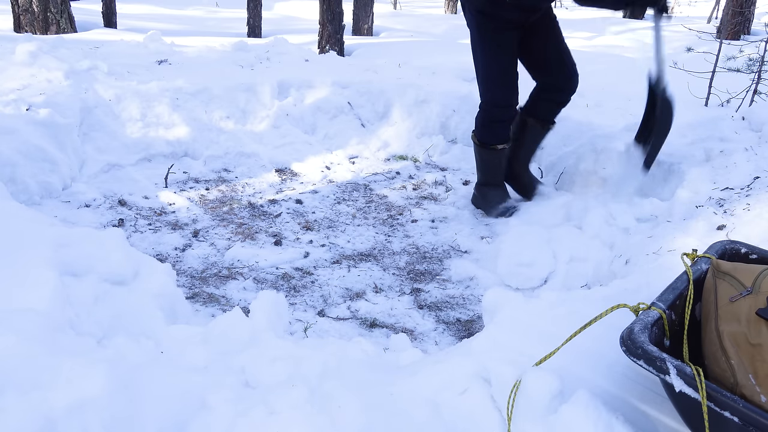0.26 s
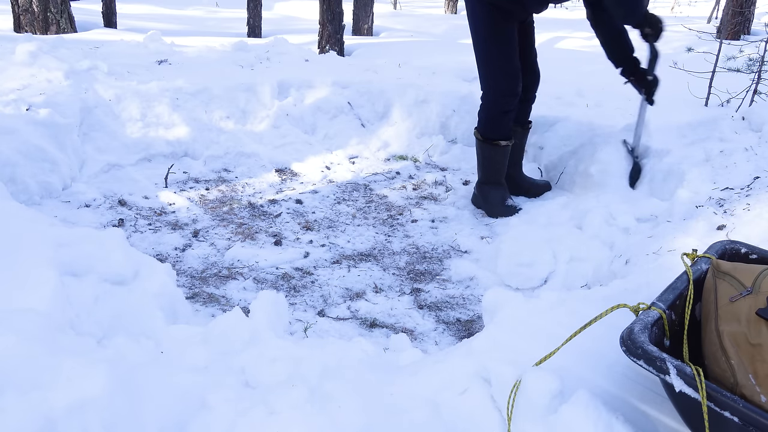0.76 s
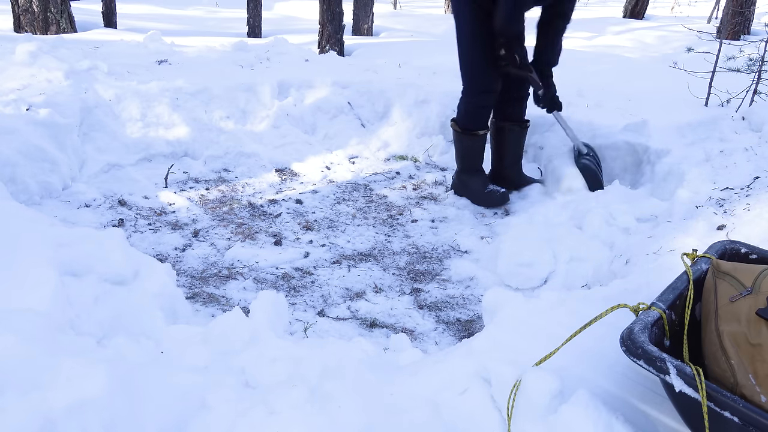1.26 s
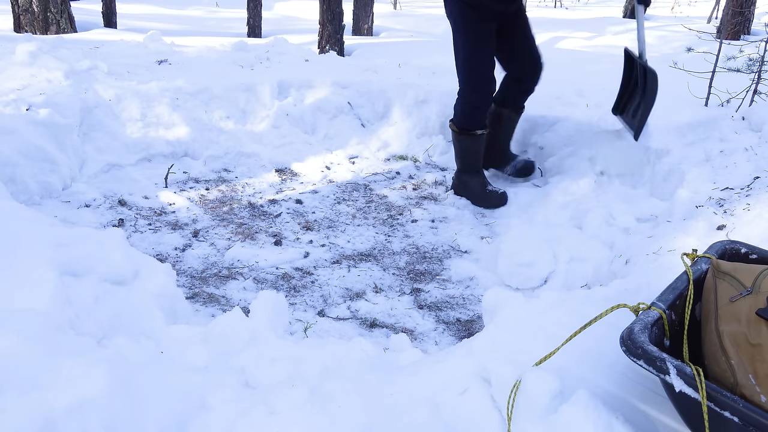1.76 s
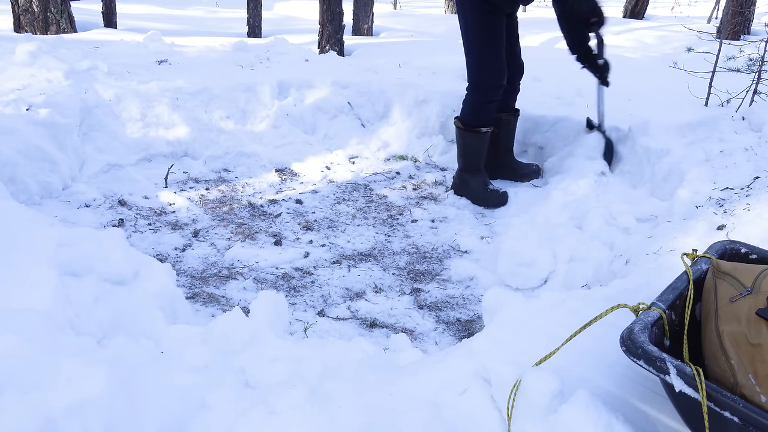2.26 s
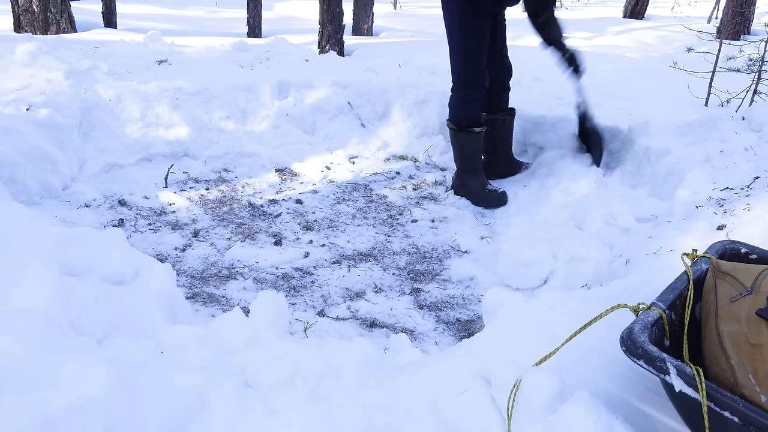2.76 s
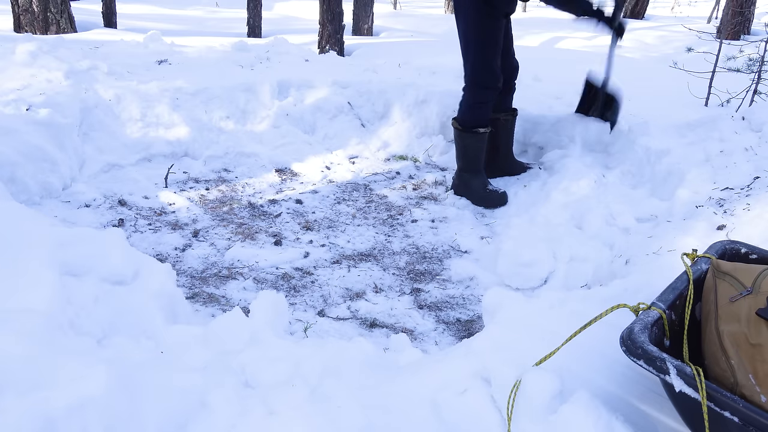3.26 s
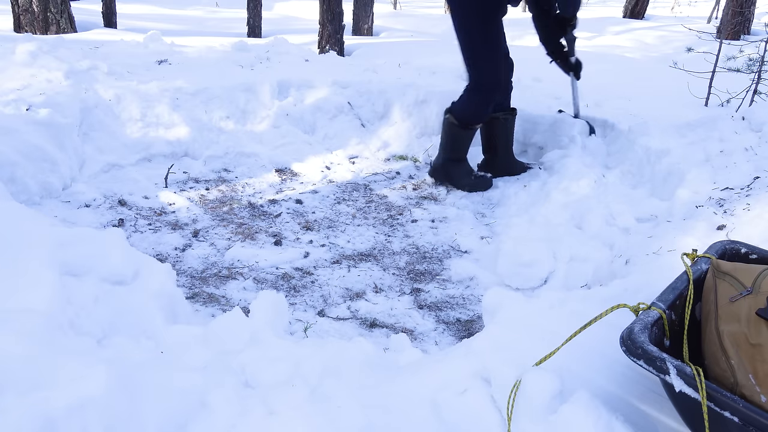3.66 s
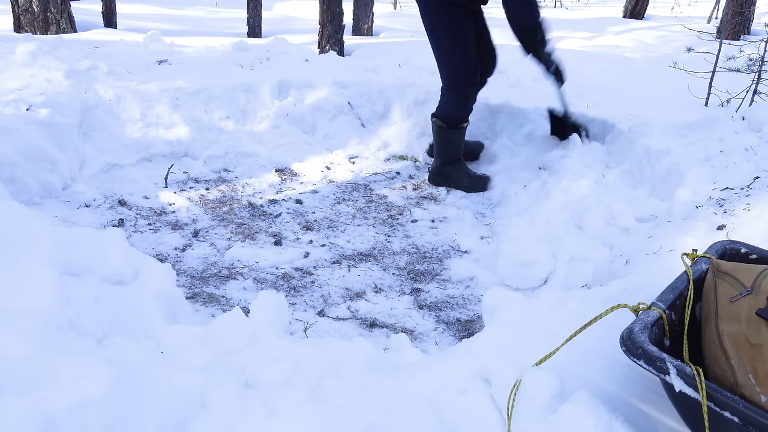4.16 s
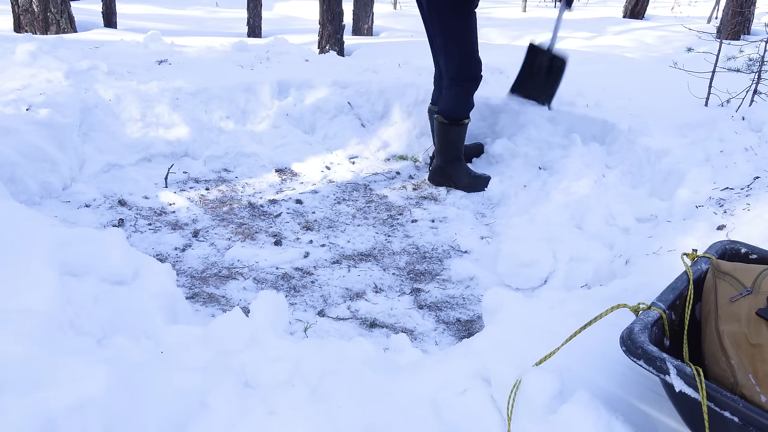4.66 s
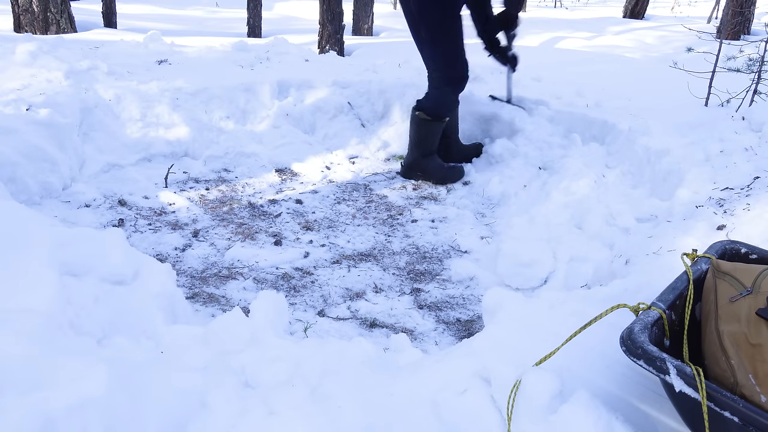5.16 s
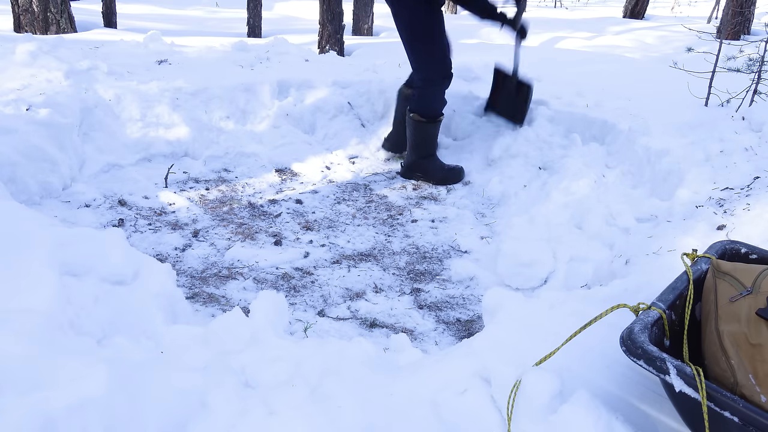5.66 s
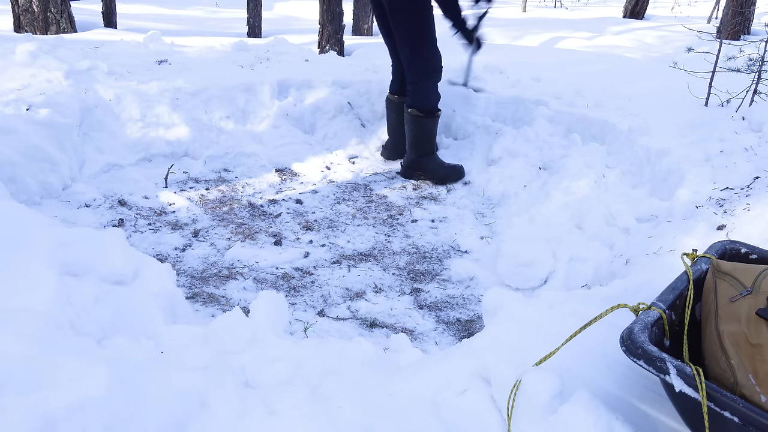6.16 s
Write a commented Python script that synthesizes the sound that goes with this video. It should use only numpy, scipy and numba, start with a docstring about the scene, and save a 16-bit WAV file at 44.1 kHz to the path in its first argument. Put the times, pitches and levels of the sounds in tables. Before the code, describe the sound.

A shovel bites into crusty packed snow with loud bright crunches, scoops with softer grinding, and throws loads off in rushing, crackling slides.

```python
"""A load of snow slides off a shovel in a bright swelling crunch, then the blade cuts, scoops and throws packed snow.
Ice bonds break in dense swarms of tiny random snaps, coloured as crackle, packing and powder, that also ring
the snow-damped blade; coarser pieces swing briefly at scattered pitches. Lumps crack in bursts of splinters, crust
ticks, the blade knocks and brushes, and loads and boots thud as low damped swings.
Behind it filtered noise makes light wind rumble on the microphone and a smooth hiss."""
import sys
import numpy as np
from scipy import signal
from scipy.fft import rfft, irfft
from scipy.io import wavfile
from scipy.ndimage import uniform_filter1d
from numba import njit

SR = 44100
rng = np.random.default_rng(int(sys.argv[2]) if len(sys.argv) > 2 else 0)


def unload_audio(sound):
    """Save the sound as a 16-bit wav file, at the path given as the first command line argument."""
    columns = np.transpose(np.atleast_2d(sound))
    # keep every value between -1 and 1, then stretch to whole-number steps
    steps = np.round(np.clip(columns, -1, 1) * 32767)
    wavfile.write(sys.argv[1], SR, steps.astype(np.int16))


N = 283122  # samples

# Colour of snapping bonds. Each row: frequency in Hz, gain in dB.
CRACKLE_COLOUR = [(300, -48.5), (700, 2), (1000, 2.5), (1600, -1.5), (2500, -2.5), (3500, -9),
                  (5000, -11.5), (7000, -16.5), (12000, -58.5)]
# Dull colour of snow packing together. Each row: frequency in Hz, gain in dB.
PACKING_COLOUR = [(40, -22), (120, -7), (200, -2), (290, 0), (420, -5), (650, -7.5), (900, -7), (1500, -28),
                  (3000, -48)]
# Airy colour of the finest grains. Each row: frequency in Hz, gain in dB.
POWDER_COLOUR = [(1500, -45), (3500, -4), (5000, -1), (8000, -1.5), (12000, -2), (16000, -6.5)]


def undb(db):
    """Turn dB into an amplitude factor."""
    return 10 ** (np.asarray(db) / 20)


def unit(x):
    """Scale to rms 1."""
    return x / np.sqrt(np.mean(x ** 2))


def colour(x, points, size=4096):
    """Causal filter through (Hz, dB) points, from the folded cepstrum of the log gain."""
    hz, db = np.transpose(points)
    bin_hz = np.arange(size // 2 + 1) * SR / size
    log_gain = np.interp(np.log(bin_hz + 1), np.log(hz), db) * np.log(10) / 20
    cepstrum = irfft(log_gain)
    cepstrum[1:size // 2] *= 2
    cepstrum[size // 2 + 1:] = 0
    impulse = irfft(np.exp(rfft(cepstrum)))
    return signal.fftconvolve(x, impulse)[:N]


def walk(rate):
    """Random levels, a new one every 1 / rate s with slews between them; spread 1."""
    hold = max(int(SR / rate), 2)
    steps = np.repeat(rng.standard_normal(N // hold + 1), hold)
    return unit(uniform_filter1d(steps, hold)[:N])


def ring(x, hz, t60):
    """One decaying mode; a unit click starts it at amplitude 1."""
    pole = np.exp(2j * np.pi * hz / SR - np.log(1000) / (t60 * SR))
    return signal.lfilter([1], [1, -pole], x).imag


def add(out, s, piece, db):
    """Mix a piece in at time s with the given peak."""
    i = int(s * SR)
    piece = piece[:N - i]
    out[i:i + len(piece)] += undb(db) * piece / np.max(np.abs(piece))


def air():
    """Fluttering wind rumble on the microphone and a smooth hiss, both filtered noise."""
    # Wind strength. Each row: time in seconds, level in dB around which it flutters.
    gusts = [(0.0, -40), (0.61, -31), (0.7, -33), (1.43, -28), (1.77, -30), (2.27, -52), (2.73, -39),
             (2.98, -31), (3.7, -49), (3.97, -47), (4.76, -33), (5.35, -55), (6.13, -42), (6.42, -69)]
    # Deep rumble of the wind. Each row: frequency in Hz, gain in dB.
    wind_colour = [(10, -2), (18, 18.5), (30, -22), (45, -7), (70, -21), (110, -32), (300, -68)]
    # Tone of the steady hiss. Each row: frequency in Hz, gain in dB.
    hiss_colour = [(60, -9), (200, 10), (500, 12.5), (1200, 3.5), (2500, -25), (6000, -20), (16000, 4.5)]
    hiss_db, flutter_db, flutter_per_s = -46.5, 2.3, 3.4
    s, gust_db = np.transpose(gusts)
    wind_db = np.interp(np.arange(N) / SR, s, gust_db) + flutter_db * walk(flutter_per_s)
    rumble = unit(colour(rng.standard_normal(N), wind_colour, size=16384))
    hiss = unit(colour(rng.standard_normal(N), hiss_colour))
    return undb(wind_db) * rumble + undb(hiss_db) * hiss


def brushes():
    """Fine friction heard through one broad resonance, as of the blade edge brushing hard crust."""
    # Faint narrow scrapes. Each row: start in seconds, stop in seconds, level in dB, resonance in Hz.
    scrapes = [(1.718, 1.759, -41.5, 3000), (1.787, 1.825, -42, 3000), (5.865, 5.889, -41, 3200)]
    t60_s, edge_s = 0.0024, 0.006
    out, t, friction = np.zeros(N), np.arange(N) / SR, rng.standard_normal(N)
    for start, stop, db, hz in scrapes:
        fade = np.clip(np.minimum(t - start, stop - t) / edge_s, 0, 1)
        scrape = unit(ring(ring(friction, hz, t60_s), hz, t60_s))
        out += undb(db) * fade * scrape
    return out


def thuds():
    """A soft weight presses the snowpack: a low, quickly damped swing."""
    # Boots and loads of snow landing. Each row: time in seconds, peak in dB, pitch in Hz.
    landings = [(0.048, -15, 242), (1.089, -26, 248), (1.219, -12, 247), (1.982, -18, 149),
                (2.069, -19, 100), (2.549, -18.5, 248), (2.699, -32, 40), (3.411, -16, 241),
                (3.685, -10, 169), (3.862, -17, 170), (4.131, -25, 51), (4.287, -24, 131),
                (4.709, -19, 230), (4.829, -9, 212), (5.074, -15, 267), (5.1, -23, 79), (5.179, -13.5, 242),
                (6.22, -20, 250), (6.237, -10.5, 64)]
    push_s, t60_s = 0.008, 0.039
    out, t = np.zeros(N), np.arange(9000) / SR
    for s, db, hz in landings:
        push = rng.standard_normal(len(t)) * np.exp(-t / push_s)
        add(out, s, ring(push, hz, t60_s), db)
    return out


def blade(force, spot_hz, slope_db, least_db):
    """The blade rings mostly in the modes near the pitch that the loaded spot favours."""
    # Modes of the snow-damped blade. Each row: frequency in Hz, level in dB, 60 dB decay in seconds.
    modes = [(487, -3, 0.063), (574, -3, 0.041), (655, 9, 0.012), (831, 8, 0.058), (967, 4.5, 0.076),
             (1081, 1.5, 0.059), (1207, -1.5, 0.019), (1510, -11, 0.013), (1800, -2, 0.023),
             (2000, 4, 0.031), (2470, -4.5, 0.021), (2770, -28, 0.01), (3240, -30, 0.055),
             (4920, -23, 0.025)]
    out = np.zeros(len(force))
    for hz, db, t60 in modes:
        # slope in dB per octave away from the spot's pitch, down to a floor
        spot_db = max(slope_db * abs(np.log2(hz / spot_hz)), least_db)
        out += undb(db + spot_db) * ring(force, hz, t60)
    return out


def knocks():
    """A short rough push rings the blade; the contact itself clicks."""
    # Knocks on the blade. Each row: time in seconds, peak of the ringing in dB, favoured pitch in Hz.
    strikes = [(0.459, -13, 1060), (0.535, -8.5, 960), (1.831, -3.5, 980), (1.831, -11, 3140),
               (1.848, -10, 520), (1.878, -5.5, 970), (3.034, -29, 1030), (3.12, -26, 1010),
               (3.131, -16.5, 480), (3.232, -20, 785), (3.275, -14, 1290), (3.283, -10, 970),
               (4.312, -9.5, 1120), (4.403, -14.5, 960), (4.466, -22, 503), (4.519, -26, 536),
               (4.534, -17.5, 473), (4.534, -15, 815), (4.596, -25, 490), (4.689, -11.5, 1160),
               (4.736, -9.5, 1000), (6.076, -19, 980)]
    push_s, contact_db = 0.0032, -14  # contact level relative to the ringing
    out, t = np.zeros(N), np.arange(6000) / SR
    for s, db, spot_hz in strikes:
        push = rng.standard_normal(len(t)) * np.exp(-t / push_s)
        add(out, s, blade(push, spot_hz, -43, -24.0), db)
        add(out, s, colour(push, CRACKLE_COLOUR), db + contact_db)
    return out


def ticks():
    """One abrupt break: a spike that swings a cycle or two, with a spray of fine splinters."""
    # Single snaps of crust. Each row: time in seconds, peak in dB, resonance in Hz.
    crust_snaps = [(0.421, -17.5, 1460), (0.798, -14.5, 759), (0.841, -28, 2090), (0.968, -8, 1500),
                   (1.067, -9.5, 1210), (1.312, -8, 1800), (1.379, -7, 912), (1.506, -4, 2210),
                   (1.688, -29, 676), (2.235, -23, 1880), (2.265, -12.5, 940), (2.348, -8.5, 2380),
                   (2.505, -9, 1730), (2.668, -15, 1320), (2.692, -18.5, 740), (3.175, -31, 1660),
                   (3.382, 1.5, 1580), (3.451, -9, 1510), (3.471, -15, 810), (3.511, -8, 740),
                   (3.524, -5, 960), (3.667, -15, 1330), (3.775, -9, 1050), (4.798, 5, 1660),
                   (4.814, 1, 1100), (4.823, -2.5, 910), (4.886, -17, 1760), (5.068, -11, 1020),
                   (5.13, -15, 1180), (5.456, -13, 5000), (5.653, -5.5, 2200), (5.911, -14, 400),
                   (6.155, 10, 2720), (6.198, -5, 1410)]
    spray_db, spray_t60_s = -18, 0.018
    out, t = np.zeros(N), np.arange(1024) / SR
    for s, db, hz in crust_snaps:
        swing = np.sin(2 * np.pi * hz * t) * np.exp(-t * hz / .8)
        spray = rng.standard_normal(len(t)) * undb(-60 * t / spray_t60_s)
        add(out, s, swing + undb(spray_db) * spray, db)
    return out


def cracks():
    """Each lump gives way in a quick swell of splinters that dies out and excites a short resonance."""
    # Lumps breaking. Each row: time in seconds, burst level in dB, resonance in Hz.
    lumps = [(0.235, -10.5, 1980), (0.46, -9, 1090), (0.537, -1, 2550), (0.591, 2, 2230), (0.612, 0, 2500),
             (0.629, 0.5, 2600), (0.695, -11, 2070), (0.934, -8.5, 2070), (1.216, -3.5, 1610),
             (1.439, -16, 1910), (1.499, 0.5, 2010), (1.55, -13, 2060), (1.624, -11, 2180),
             (1.831, 2.5, 1000), (1.894, 3.5, 990), (1.942, 1.5, 1380), (1.978, 3, 1020), (2.024, 6.5, 795),
             (2.046, -1.5, 1490), (2.109, -3.5, 850), (2.162, -5, 3000), (2.192, 1, 740),
             (3.033, -14.5, 1070), (3.12, -22, 1500), (3.232, -1, 910), (3.274, 6.5, 990),
             (3.311, -15, 1040), (3.689, -3.5, 474), (3.703, -3, 780), (4.405, -10, 950), (4.533, -21, 800),
             (4.673, -15.5, 2460), (4.692, 0, 1090), (4.737, -1, 1650), (4.769, 0, 2040), (4.849, -4, 1560),
             (5.557, -2.5, 1380), (5.617, -6.5, 1980), (5.643, -5, 980), (5.742, -9, 1050),
             (6.068, -23, 2390), (6.129, 0, 2660), (6.188, 5.5, 1430), (6.217, -1, 590)]
    rise_s, t60_s, ring_cycles = 0.00097, 0.036, 9.9
    splinters, body, t = np.zeros(N), np.zeros(N), np.arange(4096) / SR
    for s, db, hz in lumps:
        noise = rng.standard_normal(len(t))
        rough = noise * np.abs(noise[::-1])  # a random level on every sample makes it spiky
        burst = rough * (1 - np.exp(-t / rise_s)) * undb(-60 * t / t60_s)
        add(splinters, s, burst, db)
        add(body, s, ring(burst, hz, ring_cycles / hz), db)
    bright = undb(4.0) * colour(splinters, CRACKLE_COLOUR)
    airy = undb(-5.0) * colour(splinters, POWDER_COLOUR)
    dull = undb(-29.0) * colour(splinters, PACKING_COLOUR)
    return bright + airy + dull + undb(-9.0) * body


def breaking(per_s, spread_db, swarm_db, bed_db):
    """Bonds snap at random, few large and many small, in swarms; the smallest merge into a bed of noise."""
    struck = rng.random(N) < per_s / SR
    size = undb(spread_db * np.minimum(rng.exponential(size=N), 6))
    snaps = struck * size * rng.standard_normal(N)
    swarms = undb(swarm_db * (walk(35) + walk(130)))
    return unit(swarms * (unit(snaps) + undb(bed_db) * rng.standard_normal(N)))


@njit
def chips(start, hz, cycles, size, count):
    """Each broken piece swings at its own pitch for a few cycles."""
    out = np.zeros(count)
    for k in range(len(start)):
        swing = size[k] + 0j
        pole = np.exp((2j * np.pi - 1 / cycles[k]) * hz[k] / SR)
        stop = min(start[k] + int(6 * cycles[k] * SR / hz[k]), count)
        for i in range(start[k], stop):
            out[i] += swing.imag
            swing *= pole
    return out


def crunch(centre_hz, per_s, octaves, cycles, spread_db):
    """Coarse pieces of crust break off in clumps, their pitch scattered around a drifting centre."""
    start = np.flatnonzero(rng.random(N) < per_s / SR * undb(4.0 * walk(60)))
    count = len(start)
    scatter = 2 ** (octaves * rng.standard_normal(count))
    drift = 2 ** (0.298 * walk(30))
    hz = np.clip((centre_hz * drift)[start] * scatter, 120, 9000)
    length = cycles * (.5 + rng.random(count))
    size = undb(spread_db * rng.exponential(size=count))
    return unit(chips(start, hz, length, size, N))


def movement(times, dbs, hz, pack_db, powder_db, kind):
    """Power of crackle, packing and powder, and crackle power times log pitch, through one movement."""
    rise, fall, pack_change_db, powder_change_db = kind
    t = np.arange(N) / SR
    before, after = np.clip(times[0] - t, 0, 1), np.clip(t - times[-1], 0, 1)
    db = np.interp(t, times, dbs) - rise * before - fall * after
    along = np.interp(t, [times[0], times[-1]], [-.5, .5])
    power = undb(2 * db)
    pack_ratio = undb(2 * (pack_db + pack_change_db * along))
    powder_ratio = undb(2 * (powder_db + powder_change_db * along))
    return power * np.array([np.ones(N), pack_ratio, powder_ratio, np.full(N, np.log(hz))])


def work():
    """All movements add up in power; the strongest crackle weighs most in the mean pitch of the pieces."""
    # Cuts, scoops and grazes. Each row: start in seconds, stop in seconds, crackle at start in dB, crackle
    # at stop in dB, pitch of the pieces in Hz, mid-movement packing and powder in dB relative to crackle.
    cuts = [(0.537, 0.703, -14, -13.5, 1960, -10.5, -8), (1.831, 1.93, -15, -20, 990, -10.5, -8),
            (1.943, 2.055, -15, -14.5, 1680, -14.5, -6), (2.163, 2.208, -21.5, -24, 1990, -12.5, -3),
            (3.274, 3.412, -13, -16.5, 1357, -12.5, -6), (4.738, 4.858, -11.5, -19, 1454, -8.5, -7),
            (6.069, 6.24, -20.5, -19, 1630, -3, -2.5)]  # the blade bites into the crust at once and brakes as the snow packs under it
    scoops = [(0.75, 0.98, -32.5, -27.5, 1610, -2, -4.5), (1.0, 1.14, -31, -27, 1400, -6.5, -5.5),
              (1.18, 1.33, -23.5, -27.5, 1470, 0, -3.5), (2.23, 2.6, -32, -24.5, 1520, -5.5, -5.5),
              (3.46, 3.53, -30.5, -32, 1040, -1.5, -6.5), (3.57, 3.67, -36, -35, 1060, 0.5, -3),
              (3.69, 3.98, -29.5, -27, 1230, -2, -5.5), (4.915, 4.95, -33.5, -36, 1100, -0.5, -4.5),
              (5.05, 5.39, -28.5, -25, 1205, -1.5, -7.5), (6.27, 6.42, -35, -33.5, 1320, 2.5, -5.5)]  # the blade is levered and pushed slowly under the load
    grazes = [(0.3, 0.41, -51, -43, 1390, -8, 4), (0.44, 0.53, -29.5, -25, 1320, -3.5, -2),
              (1.54, 1.635, -28.5, -33, 1790, -11, -1.5), (1.8, 1.828, -37, -43, 1100, -16, -17),
              (2.095, 2.15, -24, -25, 1200, -2, -7), (3.122, 3.15, -36, -41.5, 1010, -8, -23),
              (3.195, 3.27, -37, -26.5, 1580, -10, -1), (4.4, 4.43, -39, -38.5, 950, -6, -17),
              (4.525, 4.63, -37.5, -44, 890, 7.5, -13), (4.675, 4.735, -33.5, -18.5, 1350, -3.5, -1.5),
              (4.97, 5.03, -40, -41, 1100, 0, -4), (5.455, 5.5, -39.5, -37, 1500, 4.5, 4.5),
              (5.675, 5.73, -27.5, -28.5, 1590, -1, -1), (5.742, 5.808, -28, -30.5, 1210, 5.5, 0.5),
              (5.84, 5.92, -42, -41, 1080, 0.5, -17), (6.03, 6.066, -37, -32, 1490, 3, -5.5)]  # the blade tip or a boot grazes the surface
    # The load slides off, swelling to a peak. Each row: start, peak and stop in seconds, crackle at peak in dB,
    # crackle at stop in dB, pitch in Hz, mid-movement packing and powder in dB relative to crackle.
    throws = [(0.0, 0.081, 0.25, -18.5, -29.5, 1940, -17, -3),
              (1.314, 1.467, 1.495, -17, -21.5, 1770, -20, -3),
              (2.66, 2.789, 2.9, -23.5, -28.5, 1780, -29, -2),
              (4.098, 4.212, 4.325, -20.5, -25, 1626, -8.5, -3.5),
              (5.525, 5.595, 5.655, -16.5, -19.5, 1700, -10, -3.5)]
    # Loose crystals trickling all the while. The one row: crackle in dB, pitch in Hz, packing and powder
    # halfway through in dB relative to crackle.
    trickle = (-50.5, 1298, 4, -1.5)
    # rise before the start and fall after the stop in dB/s, change of packing and of powder over it in dB
    cut, scoop, graze, throw = (4000, 422, 14, -5), (247, 197, -3, -0.5), (900, 500, -1, -2.5), (296, 340, -4, 4)
    swell_db = 13  # a throw starts this far below its peak
    total = movement([0, N / SR], [trickle[0]] * 2, *trickle[1:], scoop)
    for rows, kind in ((cuts, cut), (scoops, scoop), (grazes, graze)):
        for start, stop, start_db, stop_db, *tone in rows:
            total += movement([start, stop], [start_db, stop_db], *tone, kind)
    for start, peak, stop, peak_db, stop_db, *tone in throws:
        total += movement([start, peak, stop], [peak_db - swell_db, peak_db, stop_db], *tone, throw)
    crackle_gain, pack_gain, powder_gain = np.sqrt(total[:3])
    return crackle_gain, pack_gain, powder_gain, np.exp(total[3] / total[0])


def snow():
    """The fractures sound as bright crackle, pitched crunch, ringing of the blade, dull packing and powder hiss."""
    crackle_gain, pack_gain, powder_gain, centre_hz = work()
    snaps = breaking(2500, 2.88, 1.37, 0.54)
    lumps = breaking(800, 2.27, 2.0, -0.35) + .5 * snaps
    grains = breaking(6000, 2.2, 1.47, 1.8) + 0.9 * snaps
    pieces = crunch(centre_hz, 1500, 0.377, 3.44, 2.15)
    crackle = undb(-2.5) * unit(colour(snaps, CRACKLE_COLOUR)) + undb(-3.5) * pieces
    ringing = undb(-9.5) * unit(blade(snaps, 1160, -26, -13.5))
    # the snowpack under the blade rubs with a low, hollow body
    hollow = crunch(np.full(N, 290.), 250, 0.25, 1.26, 2.9)
    packing = unit(colour(lumps, PACKING_COLOUR)) + undb(-6.5) * hollow
    powder = unit(colour(grains, POWDER_COLOUR))
    return crackle_gain * (crackle + ringing) + pack_gain * packing + powder_gain * powder


def scene():
    """Sum all sources and put the same signal in both channels."""
    mono = air() + brushes() + thuds() + knocks() + ticks() + cracks() + snow()
    return np.array([mono, mono])


def record(dry):
    """The microphone cavity resonates in the treble; the loudest peaks are rounded near full scale; the top is cut."""
    # Microphone response. Each row: frequency in Hz, gain in dB.
    mic_colour = [(25, -10), (5000, 4.5), (6300, -2), (8100, 5.5), (9800, -7), (12600, -1), (16000, -6)]
    ceiling, top_hz = 1.05, 15900
    heard = np.array([colour(channel, mic_colour) for channel in dry])
    rounded = heard / (1 + np.abs(heard / ceiling) ** 4) ** (1 / 4)
    top_cut = signal.ellip(12, .2, 95, top_hz, fs=SR, output="sos")
    return signal.sosfilt(top_cut, rounded)


dry = scene()
out = record(dry)
unload_audio(out)
```